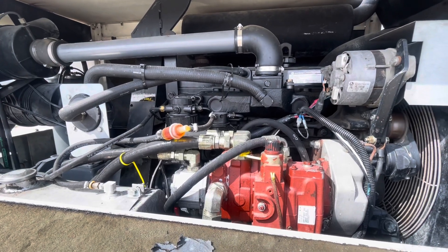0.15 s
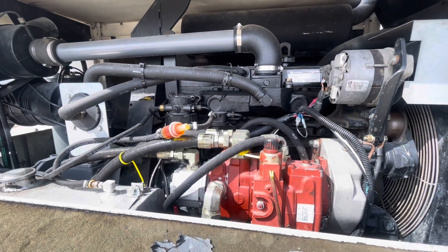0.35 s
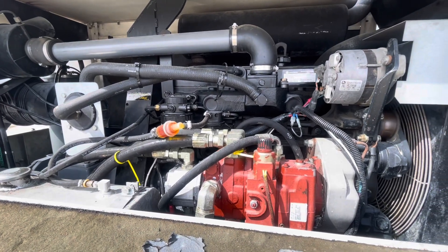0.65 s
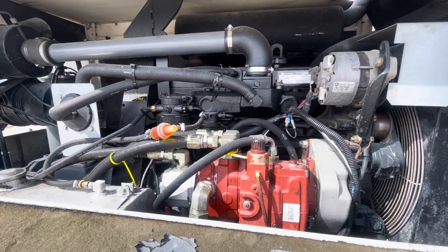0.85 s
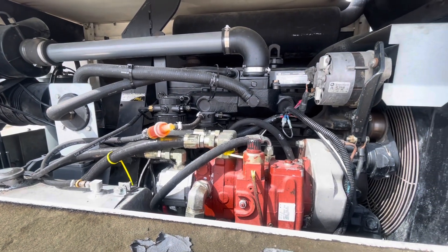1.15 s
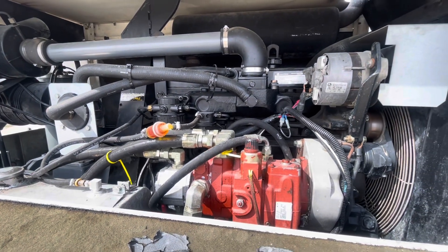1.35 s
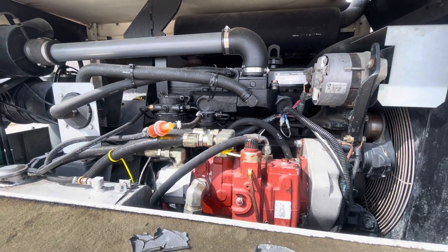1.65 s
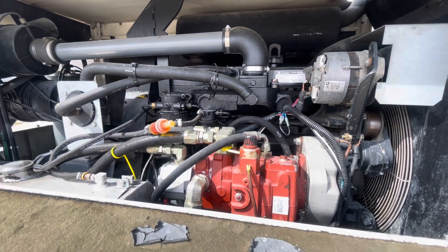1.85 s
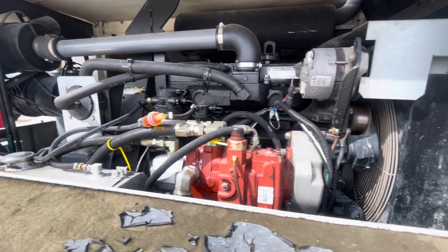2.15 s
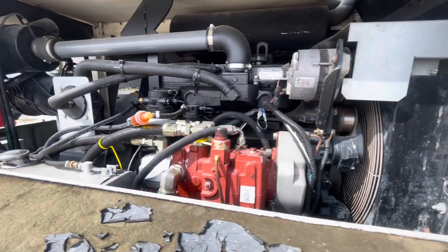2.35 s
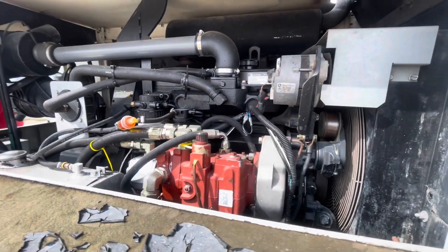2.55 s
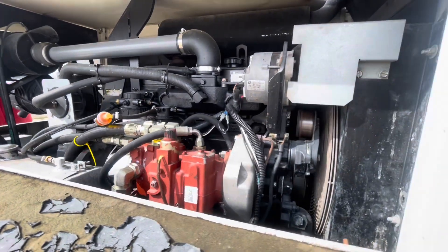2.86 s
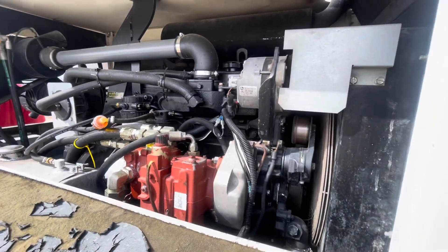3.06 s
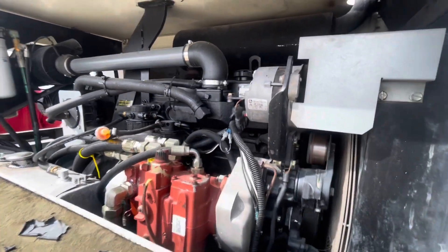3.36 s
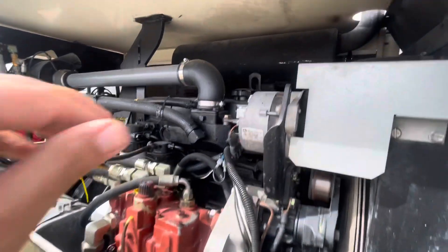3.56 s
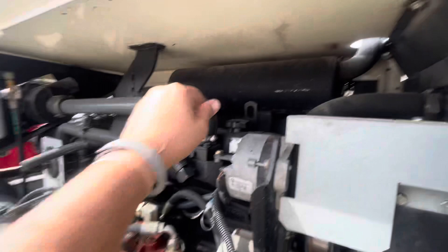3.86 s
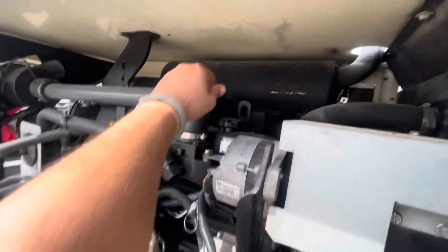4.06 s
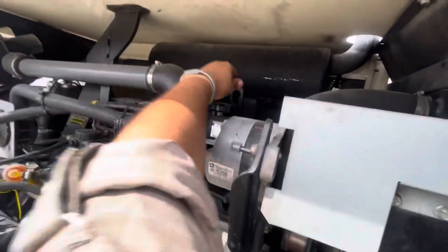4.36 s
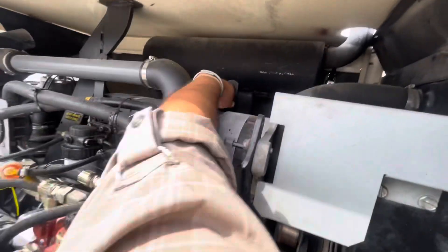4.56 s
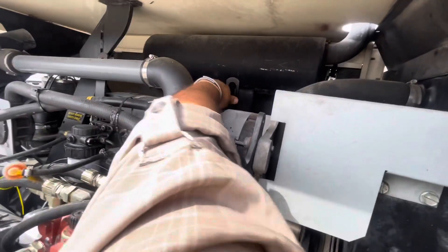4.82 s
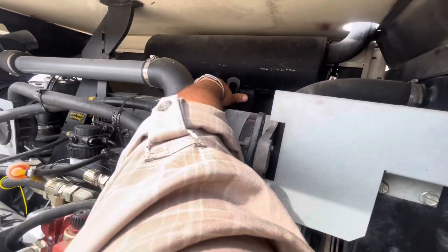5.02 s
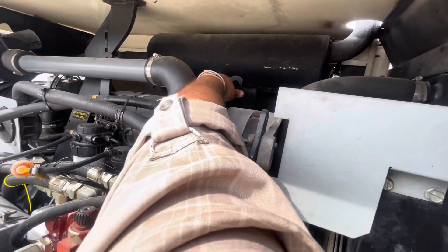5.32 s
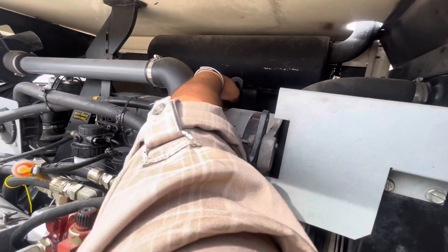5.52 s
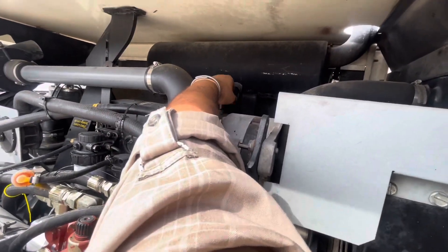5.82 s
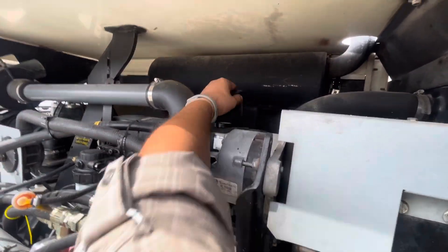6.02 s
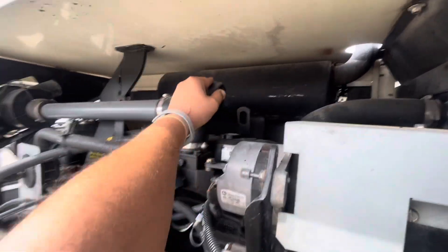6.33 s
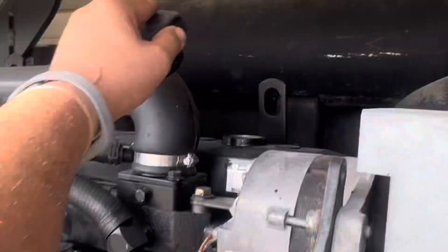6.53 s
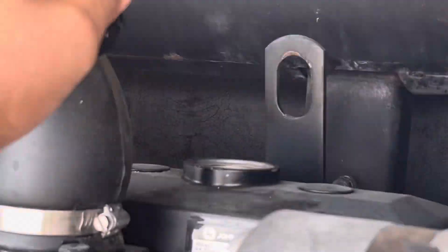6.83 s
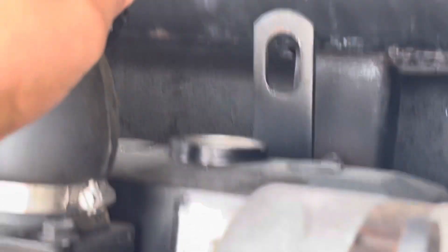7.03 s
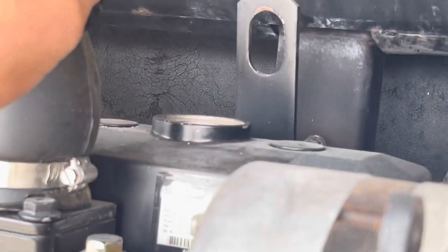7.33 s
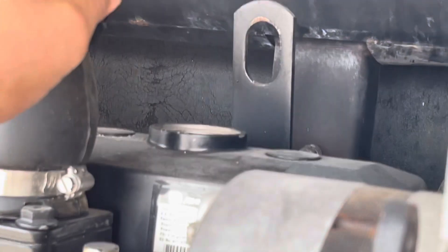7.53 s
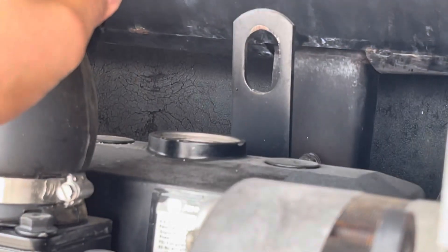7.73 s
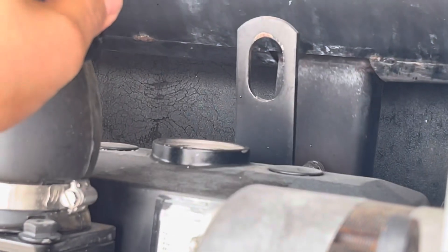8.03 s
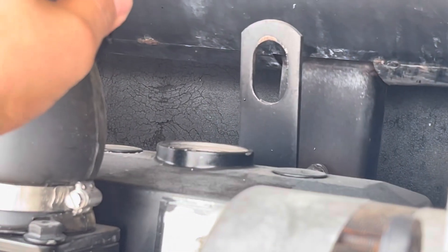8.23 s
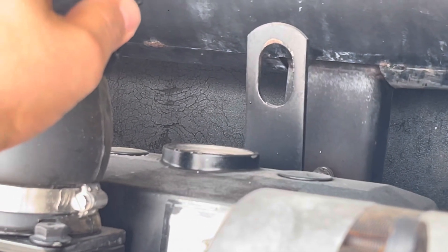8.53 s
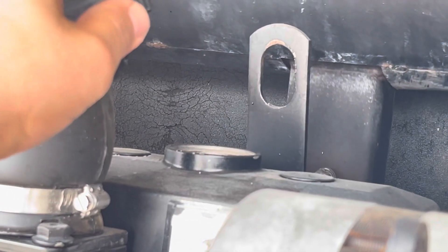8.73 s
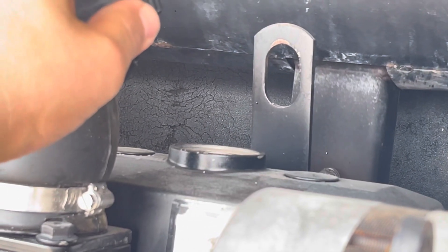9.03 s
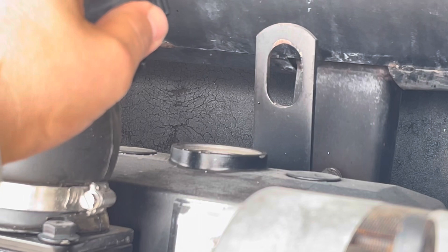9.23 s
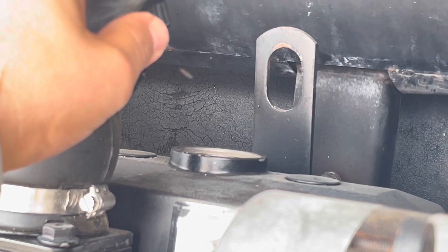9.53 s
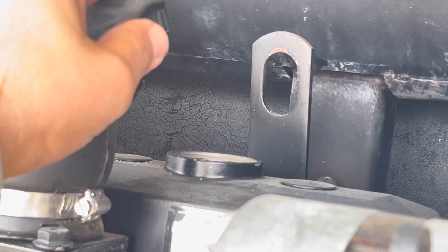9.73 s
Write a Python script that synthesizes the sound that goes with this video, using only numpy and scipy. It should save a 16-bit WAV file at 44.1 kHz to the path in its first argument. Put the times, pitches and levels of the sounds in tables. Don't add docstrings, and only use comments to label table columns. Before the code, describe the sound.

Close handheld sound of a diesel engine in an open steel compartment: brief low starter grind, rapid firing rising in pitch, loud rough clatter, then a sudden easing and a small dip. The engine recovers to a constant idle with low exhaust throb, rattling valve and injector knocks, hiss, fan hum and thin ringing tones. It grows louder and nearer midway, finally more centred and focused.

```python
import sys
import numpy as np
from scipy import signal
from scipy.io import wavfile
from scipy.ndimage import uniform_filter1d

SR = 44100
rng = np.random.default_rng(int(sys.argv[2]) if len(sys.argv) > 2 else 0)


def generate_wav(signal):
    frames = np.transpose(np.atleast_2d(signal))
    scaled = np.clip(frames, -1, 1) * 32767
    pcm = np.round(scaled).astype(np.int16)
    wavfile.write(sys.argv[1], SR, pcm)


def natural_amplitude(level_db):
    exponent = np.asarray(level_db, float) / 20
    return 10 ** exponent


N = 435708

QUIET_DB = -29
CRANK_S = (0.34, 0.98)
FAN_RATIO = 5.35
# (time [s], firing rate [Hz])
SPEED = [(0, 23.98), (.16, 32.21), (.27, 36.86), (.46, 42.62), (.69, 47.41), (.93, 50.86), (1.26, 54.03),
         (1.62, 55.05), (1.9, 53.71), (2.2, 46.5), (2.5, 46.05), (3.05, 47.86), (3.47, 49.05),
         (4.24, 49.41), (5.64, 49.5), (6.7, 49.42), (8.2, 49.58), (9.88, 49.68)]
# (time [s], level [dB])
ENGINE = [(0, -27), (.16, -19.5), (.27, -18.5), (.46, -16), (.69, -16), (.92, -18), (1.27, -20.5),
          (1.62, -24.5), (1.9, -26.5), (2.21, -26), (2.7, -27.5), (3.25, -27), (3.53, -25), (4.4, -21.5),
          (5.64, -21.5), (6.4, -21.5), (6.7, -21), (9.88, -20.5)]
# (time [s], share of full fuel [0-1])
FUEL = [
    (0, 0.78),
    (.8, 0.89),
    (1.89, 0.93),
    (1.93, 0.01),
    (9.88, 0.06),
]
# (time [s], share [0-1])
HELD_IN = [
    (3.9, 0.03),
    (4.45, 0.94),
    (6, 1.),
    (6.3, 0.37),
]


def evened(x):
    return x / np.sqrt(np.mean(x ** 2, axis=-1, keepdims=True) + 1e-20)


def over_time(rows, t):
    seconds, values = np.transpose(rows)
    return np.interp(t, seconds, values)


def over_hz(rows, hz):
    table_hz, *values = np.transpose(rows)
    return [np.interp(np.log(hz + 1), np.log(table_hz + 1), v)[:, None] for v in values]


def drift(rate_hz, t):
    steps = rng.standard_normal(int(N / SR * 40) + 2)
    smooth = signal.filtfilt(*signal.butter(2, np.clip(rate_hz / 20, .01, .9)), steps)
    return np.interp(t * 40, np.arange(len(steps)), evened(smooth))


def held_chance(t, rows):
    block_s = .0232
    return rng.random((rows, int(N / SR / block_s) + 9))[:, (t / block_s).astype(int)]


def spectra(x):
    return signal.stft(x, SR, nperseg=1024, noverlap=768)


def waves(z):
    return signal.istft(z, SR, nperseg=1024, noverlap=768)[1][..., :N]


def band_pass(x, order, low_hz, high_hz):
    return signal.sosfilt(signal.butter(order, [low_hz, high_hz], "band", fs=SR, output="sos"), x)


def bump(hz, centre_hz, width_hz, db):
    return db / (1 + (2 * (hz - centre_hz) / width_hz) ** 2)


def narrowing(t):
    return np.interp(t, [6.52, 6.62], [0, 1])


def clatter_levels(t):
    louder_db = over_time(ENGINE, t) - QUIET_DB
    fuel, near = over_time(FUEL, t), narrowing(t)
    starter = np.interp(t, CRANK_S, [1, 0])
    pinion = np.exp(-((t - 0.041) / 0.061) ** 2)
    level_db = -28.5 + 0.41 * louder_db + 5 * fuel - 2.5 * starter + 8.5 * pinion + 1.17 * near
    hiss_db = -0.35 + 0.43 * louder_db + 3 * starter + 4 * pinion - 1.5 * near
    rumble_db = -3 + 0.21 * louder_db - 1.5 * fuel + 10 * starter - 3.5 * pinion + 3.5 * near
    return level_db, hiss_db, rumble_db


def impacts(firings, fuel, count, jitter_ms, spread_db, cylinder_spread):
    places = (np.arange(count) + rng.random(count)) / count
    sizes = natural_amplitude(spread_db * rng.standard_normal(count))
    uneven = rng.standard_normal((4, count))
    cylinders = np.sign(uneven + .5) * (1 + cylinder_spread * np.tanh(uneven[::-1]))
    cylinders = evened(cylinders - 0.77 * cylinders.mean(0))
    number = np.arange(int(firings[-1]))
    chance = rng.standard_normal((len(number), count, 2))
    loose_ms = jitter_ms + .07 * np.interp(number, firings, fuel)[:, None]
    at = np.interp(number[:, None] + places, firings, np.arange(N))
    at += chance[..., 0] * loose_ms / 1000 * SR
    size = sizes * cylinders[number % 4] * natural_amplitude(chance[..., 1])
    return np.bincount(np.clip(at, 0, N - 1).astype(int).ravel(), size.ravel(), N)


def knocks(firings, fuel):
    t = np.arange(SR // 8) / SR
    bands_hz = (60, 890, 1880, 3340, 6070, 16500)
    decays_s = (0.21, 0.12, 0.066, 0.13, 0.078)
    out = np.zeros((2, N))
    for low_hz, high_hz, t60 in zip(bands_hz, bands_hz[1:], decays_s):
        echoes = rng.standard_normal((2, len(t))) * natural_amplitude(-60 * t / t60)
        echoes = band_pass(echoes, 3, low_hz, high_hz)
        train = impacts(firings, fuel, count=9, jitter_ms=.015, spread_db=4.5, cylinder_spread=0.69)
        ringing = signal.oaconvolve(train[None], echoes, axes=1)[:, :N]
        out += np.sqrt(high_hz - low_hz) * evened(ringing)
    return evened(out)


def gated_hiss(firings):
    turn = 2 * np.pi * firings
    late_turn = 2 * np.pi * (firings - .2)
    beat = 0.056 * np.cos(late_turn) + 0.075 * np.cos(2 * late_turn)
    beat += 0.0095 * np.cos(turn / 4) + 0.007 * np.cos(3 * turn / 4)
    flicker = evened(uniform_filter1d(rng.standard_normal(N), 300))
    swell = np.exp(1.1 * beat + 0.11 * flicker + .06 * drift(6., np.arange(N) / SR))
    return evened(rng.standard_normal((2, N)) * swell)


def blows(rows, firings):
    fresh_share = 0.25
    t = np.arange(1400) / SR
    out = np.zeros((2, N + len(t)))
    cycles = np.arange(int(firings[-1] / 4))
    for place, hz, width_hz, db in rows:
        at = np.interp(4 * cycles + place, firings, np.arange(N)).astype(int)
        same = np.sqrt(SR / hz) * np.cos(2 * np.pi * (hz * t + rng.random((2, 1))))
        fresh = rng.standard_normal((len(at), 2, len(t)))
        t60 = 0.008 + 14 / hz
        strike = np.sqrt(1 - fresh_share) * same + np.sqrt(fresh_share) * fresh
        strike = strike * np.tanh(t / 0.001) * natural_amplitude(-60 * t / t60)
        rings = evened(band_pass(strike, 2, hz - width_hz / 2, hz + width_hz / 2))
        rings *= natural_amplitude(db + .8 + 1.3 * fresh[:, :1, :1])
        rings *= np.sqrt(width_hz * t60 / np.log(1000) / len(t))
        for start, ring in zip(at, rings):
            out[:, start:start + len(t)] += ring
    return out[:, :N]


def clatter_colour(hz, t):
    # (frequency [Hz], level [dB per Hz])
    wide_colour = [(35, 9), (70, -7), (230, 7.5), (330, -1.5), (420, -0.5), (750, -3.5), (1250, 0),
                   (2000, -7.5), (2700, -9), (3700, -15), (5600, -14), (7600, -15.5), (10600, -16),
                   (12200, -24.5)]
    near_colour = [(35, 7), (70, -7.5), (230, 3.5), (330, -6.5), (420, -3), (750, -5), (1250, -2.5),
                   (2000, -6), (2700, -8), (3700, -15), (5600, -17), (7600, -14), (10600, -13),
                   (12200, -20)]
    # (frequency [Hz], width [Hz], wide-aim lift [dB], narrow-aim lift [dB],
    # extra under full fuel [dB], extra when held in close [dB])
    block_rings = [(335, 36, 3, 7, 2.5, 4), (553.5, 22, 1, 4.5, 8.5, 1), (738, 154, 5.5, 2.5, -0.5, 0.5),
                   (1020, 53, 3.5, 2, 4, 5.5), (840, 110, 0, 2.5, -1, 1.5), (1172, 110, 8.5, 4.5, -2, -5),
                   (1445, 65, 4, -2, 2, -0.5), (1607, 184, -3, 3.5, -3, 6), (2040, 42, 9, 10, 0.5, -4),
                   (2560, 270, 5.5, 5.5, 0.5, -2.5), (3110, 390, 2, 4.5, 3, 3.5), (4590, 63, 4, 9, 3, -4),
                   (5130, 100, 6, 6, -5, 0), (4920, 50, 2, 3.5, 1.5, 1), (5686, 126, 10, 6.5, -3.5, 1),
                   (6090, 210, 6.5, 7, 0.5, -2), (6870, 140, 8.5, 9.5, -1, -7.5),
                   (8450, 330, 2.5, 8, -6, -2.5)]
    # (frequency [Hz], width [Hz], lift [dB], middle [s], half length [s])
    start_rings = [(2720, 330, -5, .15, 0.68), (5900, 1500, 3, 0.96, 0.25), (560, 50, 8, 0.31, 0.044),
                   (345, 50, 12, 0.24, 0.066), (450, 150, -1.5, 0.42, 0.59), (198, 50, -16, 0.82, 0.22),
                   (2050, 450, -2.5, 2, 0.42), (140, 60, -1, 0.66, .3), (4560, 1800, -2.5, 0.44, 0.47),
                   (990, 50, 5, 0.97, 0.23), (555, 35, 5, 0.77, 0.23), (1330, 170, 3.5, 0.63, 0.53),
                   (265, 49, 4, 2.25, 0.13), (560, 44, 5, 0.051, 0.1), (5000, 250, 4, 4., 0.45)]
    near, fuel, held_in = narrowing(t), over_time(FUEL, t), over_time(HELD_IN, t)
    colour_db = (1 - near) * over_hz(wide_colour, hz)[0] + near * over_hz(near_colour, hz)[0]
    hz = hz[:, None]
    for ring_hz, width_hz, wide_db, near_db, fuel_db, held_db in block_rings:
        lift_db = (1 - near) * wide_db + near * near_db + fuel * fuel_db + held_in * held_db
        wandering_hz = ring_hz * (1 + 0.0043 * drift(2.3, t))
        colour_db += bump(hz, wandering_hz, width_hz, lift_db + 1.5 * drift(2.55, t))
    for ring_hz, width_hz, db, middle_s, half_s in start_rings:
        colour_db += bump(hz, ring_hz, width_hz, db * np.exp(-((t - middle_s) / half_s) ** 2))
    notch_hz = np.interp(held_in, [0, 1], [405, 1090])
    colour_db += bump(hz, notch_hz, 126, -6.5 * np.tanh(6 * held_in))
    colour_db += bump(hz, 3 * notch_hz, 330, -7. * held_in)
    colour_db += bump(hz, 10550, 900, 4)
    return colour_db - np.clip(hz - 12300, 0, 1200) * .012


def clatter(firings, fuel):
    # (frequency [Hz], share [0-1])
    repeats = [(250, 0.11), (350, 0.2), (700, 0.13), (1300, 0.28), (2500, 0.18), (4000, 0.44), (9000, 0.56)]
    # (place in the cycle [firings 0-4], frequency [Hz], width [Hz], level over the clatter [dB])
    light_blows = [(2.84, 980, 330, 9), (2.86, 1550, 600, 10), (2.3, 600, 220, 9), (3.25, 730, 240, 7),
                   (.3, 520, 200, 7), (3.8, 700, 240, 6), (3.78, 1200, 350, 4), (.75, 1200, 350, 4),
                   (2.03, 950, 300, 5), (1.9, 1320, 400, 5), (1.1, 1500, 400, 3), (1.05, 500, 180, 5),
                   (1.75, 2150, 500, 5), (3.66, 2150, 500, 4), (2.25, 2640, 600, 5), (2.75, 2900, 800, 4.5),
                   (.3, 2640, 600, 3), (.1, 3600, 900, 3), (.12, 7900, 3000, 5), (1.17, 7300, 3000, 6.5),
                   (2.15, 7300, 3000, 7), (3.15, 7600, 3000, 2), (1.33, 4800, 1300, 5),
                   (2.35, 5200, 1400, 4.5)]
    fuel_blows = [(.42, 1450, 450, 10), (.72, 1450, 450, 10), (3.04, 2620, 500, 12), (1.04, 2600, 450, 6),
                  (1.66, 1960, 450, 7), (2.47, 1960, 450, 6), (2.12, 810, 280, 10), (2.87, 660, 240, 10),
                  (3.1, 850, 280, 8), (3.47, 1230, 400, 10), (1.46, 1200, 380, 6), (2.6, 1460, 400, 5),
                  (.12, 600, 220, 5), (1.17, 490, 180, 7), (.85, 3550, 800, 4), (1.25, 3550, 800, 4),
                  (2.48, 6300, 2200, 5), (.3, 7000, 2400, 3), (1.42, 8600, 2600, 6), (2.42, 8800, 2600, 6),
                  (3.6, 9500, 2400, 4)]
    chug = np.exp(0.1 * fuel * np.cos(np.pi * firings))
    hz, t, z_knock = spectra(chug * knocks(firings, fuel))
    z_hiss = spectra(np.sqrt(chug) * gated_hiss(firings))[2]
    sharpen = np.interp(firings, [18, 55], [.5, 1.2])
    struck = fuel * sharpen * blows(fuel_blows, firings) + (1 - fuel) * blows(light_blows, firings)
    z_blows = spectra(struck)[2]
    fuelled = over_time(FUEL, t)
    share = np.clip(over_hz(repeats, hz)[0], 0, 1)
    share = np.clip(share + 0.03 * fuelled, 0, 1)
    level_db, hiss_db, rumble_db = clatter_levels(t)
    level_db = level_db + 11.29 + 2.17 * (1 - narrowing(t))
    colour_db = clatter_colour(hz, t)
    hz = hz[:, None]
    high = 1 / (1 + (3300 / (hz + 1)) ** 4)
    low = 1 / (1 + (hz / 800) ** 4) / (1 + (75 / (hz + 1)) ** 4)
    gain = natural_amplitude(colour_db + level_db + hiss_db * high + rumble_db * low)
    wash = natural_amplitude(-1.3 * (1 - fuelled) - 3 * fuelled)
    z_wash = wash * (np.sqrt(share) * z_knock + np.sqrt(1 - share) * z_hiss)
    return waves(gain * (z_wash + z_blows))


def throb_levels(t, fuel):
    # (multiple of the firing rate, level when quiet [dB], share of the loudness followed,
    # lift when pulling [dB], lift by fuel [dB])
    main_orders = [
        (1, -30, 1.01, -2.5, 1),
        (2, -30.5, .02, 5.5, 7.5),
        (4, -28.5, 0.77, -2.5, -2),
        (3, -37.5, 1.42, -6, 4.5),
    ]
    # (frequency [Hz], level [dB])
    pipe = [(30, -20.5), (40, -0.5), (56, 2), (70, 7.5), (85, -2), (182, -9.5), (197, 3), (216, 3)]
    rate_hz = over_time(SPEED, t)
    louder_db = over_time(ENGINE, t) - QUIET_DB
    gaining = uniform_filter1d(np.gradient(rate_hz, t), size=800)
    pull = np.tanh(np.maximum(gaining, 0) / 12.6)
    catch_db = -4 * np.exp(-t / .06)
    levels_db = []
    for order, db, share, pull_db, fuel_db in main_orders:
        level_db = db + share * louder_db + pull_db * pull + fuel_db * fuel + catch_db
        levels_db.append(level_db + over_hz(pipe, order * rate_hz)[0][:, 0])
    levels_db[-1] = levels_db[-1] - 12 * np.interp(t, [2.198, 2.6, 5.8, 6.0], [0, 1, 1, 0])
    shroud_db = bump(FAN_RATIO * rate_hz, 243.5, 60, 14)
    fan_db = -43.5 + 0.18 * louder_db + 11.5 * pull * fuel + shroud_db
    return [*levels_db, fan_db]


def throb(t, firings, levels_db, clatter_db, fuel):
    # (multiple of the four-firing cycle, level [dB])
    weak_orders = [(1, -41), (2, -42), (3, -38), (4, 0), (5, -26), (6, -22), (7, -20.5), (8, -15), (9, -31),
                   (10, -29.5), (11, -24), (12, -21), (13, -22), (14, -48), (15, -18), (16, 0), (17, -33),
                   (18, -15.5), (19, -48), (20, -9), (21, -18), (22, -23), (23, -25.5), (24, -23.5),
                   (25, -19.5)]
    light = 1 - np.maximum.accumulate(fuel[::-1])[::-1]
    turns = [firings,
             2 * firings + 0.3 - 0.3 * light,
             4 * firings + 0.35 + 0.35 * light,
             3 * firings + 0.11,
             FAN_RATIO * firings + 0.053 * drift(2.8, t)]
    wavers_db = [0.14, 1.1, 0.26, 1.4, 1.4]
    out = np.zeros(len(t))
    for turn, db, waver_db in zip(turns, levels_db, wavers_db):
        out += natural_amplitude(db + waver_db * drift(1.9, t)) * np.cos(2 * np.pi * turn)
    for order, db in weak_orders:
        if order in (4, 8, 12, 16):
            continue
        fired = order % 4 == 0
        start = 0 if fired else rng.random()
        level_db = db + clatter_db + 2.0 + 1.8 * drift(10.0, t)
        level_db += fired * (3.1 * fuel + 1.1 * narrowing(t) - 4.)
        out += natural_amplitude(level_db) * np.cos(2 * np.pi * (order * firings / 4 + start))
    return np.sqrt(2) * out


def hum(t, firings, clatter_db, fuel):
    # (multiple of the firing rate, level held far off [dB], held in close [dB], in the narrow aim [dB])
    light_orders = [(6, -43, -44, -41), (7, -50, -43.5, -43.5), (10, -45, -37, -42.5), (11, -56, -42, -47),
                    (12, -37.5, -42, -45), (13, -42, -43, -41.5), (14, -57, -42, -41.5),
                    (15, -39.5, -41, -42), (16.04, -49, -49, -41.5), (19, -50, -38, -40),
                    (20, -45, -44, -41.5), (20.46, -50, -43, -41), (21.13, -37, -46, -48),
                    (21.95, -39, -52, -36), (22.93, -41, -54, -48), (23.97, -41, -37, -39),
                    (25.06, -36, -32, -39.5), (26, -47, -48, -35), (27.15, -49, -32, -37.5),
                    (28, -40, -43, -39.5), (29, -49, -50, -39), (29.95, -46, -43, -42.5),
                    (30.83, -51, -34, -61), (31.93, -41, -38.5, -41), (32.83, -47, -48, -37),
                    (33.9, -42.5, -35, -42), (34.97, -52, -37.5, -39), (36.14, -55, -57, -39),
                    (37.95, -56, -41, -39), (42.1, -45, -47, -46.5), (49.5, -45, -42, -41.5),
                    (51.85, -51, -40, -38.5)]
    # (multiple of the firing rate, level [dB])
    fuel_orders = [(6, -10.5), (7.5, -12), (8.5, -11), (10, -11), (10.5, -6), (14.75, -12), (18, -8),
                   (18.5, -10), (21, -9), (22, -4), (24, -8), (25, -10), (26, -8), (27, -7)]
    near = narrowing(t)
    far = (1 - near) * (1 - over_time(HELD_IN, t))
    close = 1 - near - far

    def sing(order):
        return np.cos(2 * np.pi * (round(4 * order) / 4 * (firings - .87) + .68 * rng.random()))

    lines, loaded = np.zeros(len(t)), np.zeros(len(t))
    for order, far_db, held_db, near_db in light_orders:
        level_db = far_db * far + held_db * close + near_db * near
        lines += natural_amplitude(level_db + drift(2.1, t)) * sing(order)
    for order, db in fuel_orders:
        loaded += natural_amplitude(db + 1.2 * drift(3.1, t)) * sing(order)
    lines *= natural_amplitude(clatter_db + 31.2 * far + 27.5 * (1 - far) - 7.0 * fuel)
    loaded *= fuel * np.interp(t, CRANK_S, [0, 1]) * natural_amplitude(clatter_db)
    return lines + loaded


def whine(t):
    # (frequency [Hz], level [dB])
    whine_lines = [
        (15240, -55),
        (15730, -55),
    ]
    louder_db = over_time(ENGINE, t) - QUIET_DB
    share = .02 * louder_db * (1 - .85 * over_time(FUEL, t))
    share += .22 * over_time(HELD_IN, t) + .6 * narrowing(t)
    gates = uniform_filter1d(1. * (held_chance(t / 1.5, rows=2) < share), 300, axis=1)
    fuzz = .5 + .8 * evened(uniform_filter1d(rng.standard_normal((2, N)), 200, axis=1))
    out = np.zeros(N)
    for (hz, db), gate in zip(whine_lines, gates * fuzz):
        out += natural_amplitude(db) * gate * np.cos(2 * np.pi * hz * t)
    return out


def scene():
    t = np.arange(N) / SR
    rate_hz = over_time(SPEED, t) * (1 + .001 * drift(5., t))
    firings = np.cumsum(rate_hz) / SR - .14
    fuel = over_time(FUEL, t)
    rumble_cut = signal.butter(6, 45, "high", fs=SR, output="sos")
    out = signal.sosfilt(rumble_cut, clatter(firings, fuel))
    t8, firings8, fuel8 = t[::8], firings[::8], fuel[::8]
    clatter8_db = clatter_levels(t8)[0]
    pipe_fuel = over_time(FUEL, t8 - 0.157)
    tones = throb(t8, firings8, throb_levels(t8, pipe_fuel), clatter8_db, fuel8)
    tones += hum(t8, firings8, clatter8_db, fuel8)
    out[0] += signal.resample_poly(tones, 8, 1)[:N]
    return out


def low_pass(x):
    return signal.sosfilt(signal.butter(12, 17040, fs=SR, output="sos"), x)


def record(dry):
    # (frequency [Hz], likeness [0-1], left-right [dB])
    wide_ports = [(60, 0.82, 0.4), (257, 0.75, -0.5), (410, 0.5, 1), (840, 0, 4.5), (1170, 0.64, 4),
                  (1740, 0, -1.5), (2200, 0.03, 1), (3600, 0.2, 5.5), (4890, 0, 6), (6560, 0, 15),
                  (8100, 0, 4.5),
                  (8700, .68, 1), (9500, .75, 0)]
    near_ports = [(60, 0.96, 0.42), (260, 0.92, 0.49), (413, 0.87, 0.5), (775, 0.88, 4.2), (1410, 0.6, 1.4),
                  (1520, 0.36, 1.8), (1697, 0.68, 0.44),
                  (2050, .995, 0), (3000, .96, 0), (3800, 1, 0), (8800, 1, 0), (9000, .85, 0)]
    top_ports = [(9720, 1, 0), (10350, 1, 0), (11400, .8, 0), (11750, 1, 0)]
    # (frequency [Hz], wide aim [turns], narrow aim [turns])
    phase_turn = [(8900, 0, 0), (9720, .5, .3), (10150, .5, .47), (10330, .5, .52), (11700, 1, 1)]
    hz, t, (direct, other) = spectra(np.clip(dry, -.9, .9))
    near, held_in = narrowing(t), over_time(HELD_IN, t)
    same_wide, lean_wide_db = over_hz(wide_ports + top_ports, hz)
    same_near, lean_near_db = over_hz(near_ports + top_ports, hz)
    lagging = np.interp(hz, [250, 700, 8000, 8500], [0, 1, 1, 0])[:, None]
    lag = 2 * np.pi * hz[:, None] * 0.46 / 1000 * lagging
    same_wide = np.clip(same_wide + lagging * ((0.82 - 1) * same_wide + 0.26 * held_in), 0, 1)
    same = (1 - near) * same_wide * np.exp(-1j * lag) + near * np.clip(same_near, 0, 1)
    turn_wide, turn_near = over_hz(phase_turn, hz)
    twist = np.exp(2j * np.pi * ((1 - near) * turn_wide + near * turn_near))
    right = same * twist * direct + np.sqrt(abs(1 - abs(same) ** 2)) * other
    right /= natural_amplitude((1 - near) * (1 - 0.24 * held_in) * lean_wide_db + near * lean_near_db - 0.16)
    edge_hz = 12150 - 230 * np.log(held_chance(t, rows=1))
    ports = waves(np.array([direct, right]) * (hz[:, None] < edge_hz))
    return low_pass(ports + whine(np.arange(N) / SR))


dry = scene()
out = record(dry)
generate_wav(out)
```